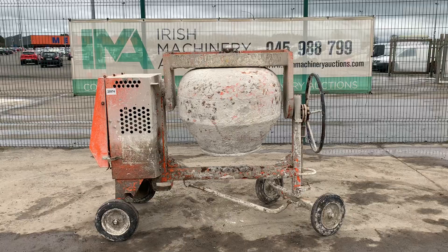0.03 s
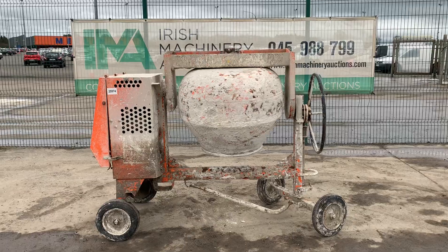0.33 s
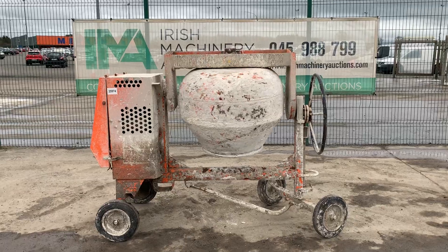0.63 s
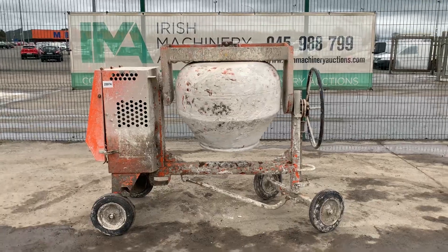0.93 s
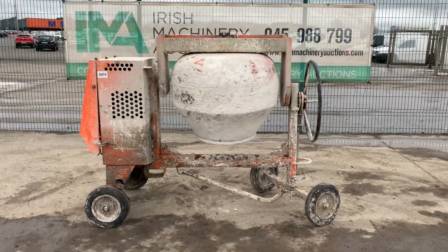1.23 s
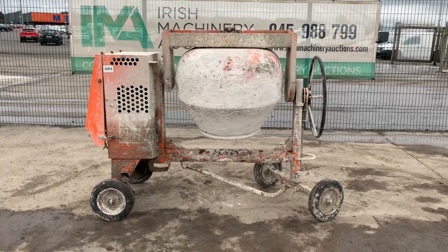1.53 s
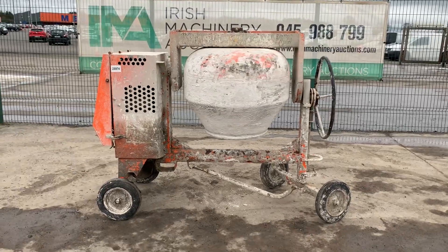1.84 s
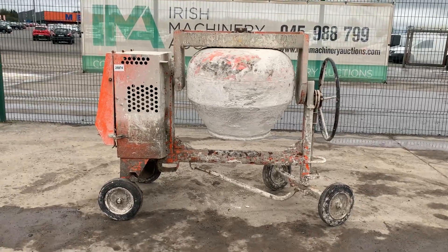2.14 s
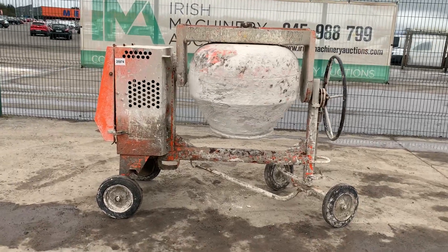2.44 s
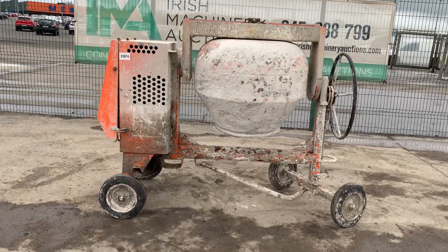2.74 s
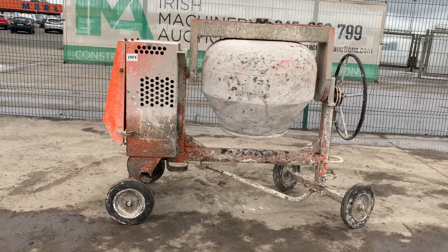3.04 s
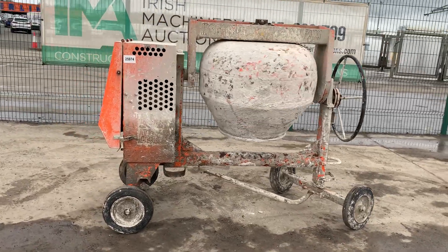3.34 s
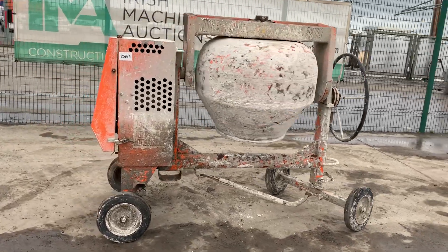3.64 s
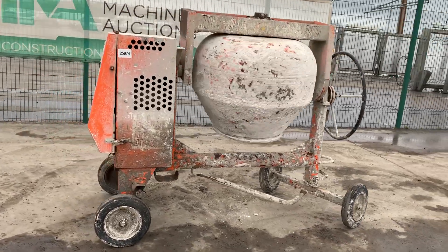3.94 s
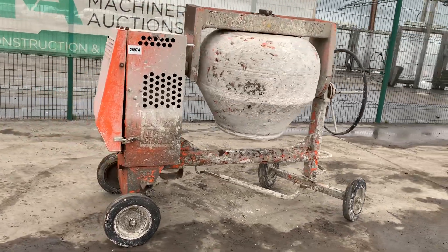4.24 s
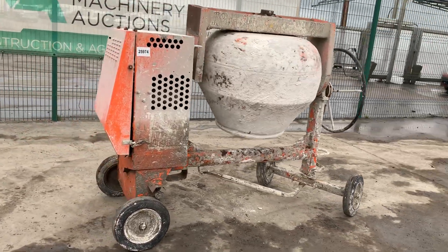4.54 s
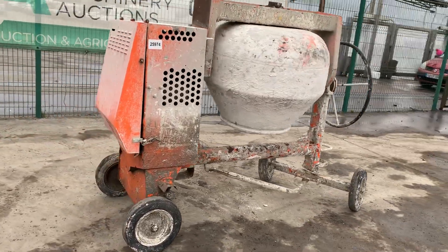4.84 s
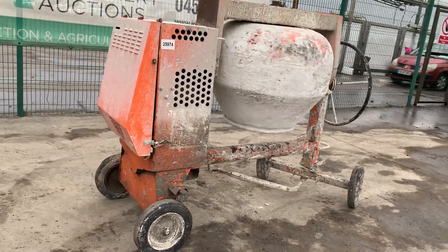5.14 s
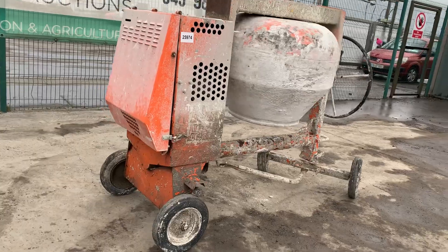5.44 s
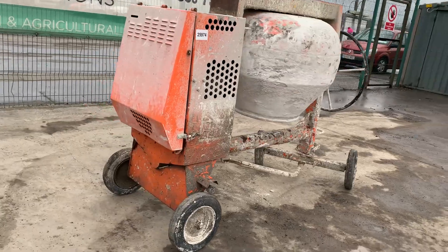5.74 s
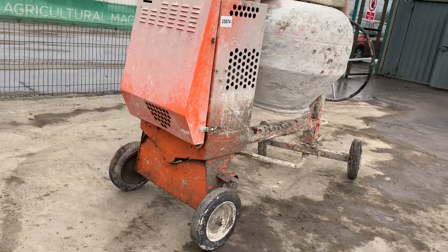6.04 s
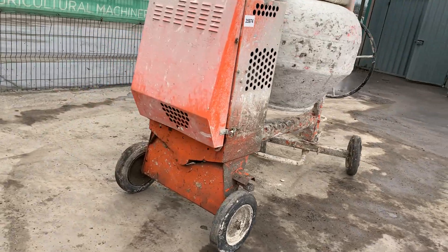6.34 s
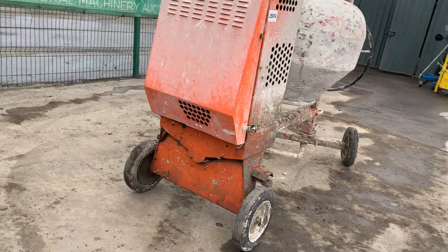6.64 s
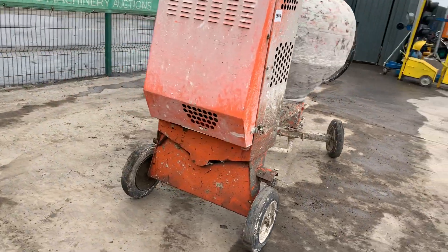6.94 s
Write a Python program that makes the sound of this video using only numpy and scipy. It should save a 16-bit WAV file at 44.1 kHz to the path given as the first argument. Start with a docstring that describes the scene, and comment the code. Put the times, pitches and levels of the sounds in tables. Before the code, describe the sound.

A diesel cement mixer chugs steadily outdoors while its empty drum turns with irregular clanks and rattles.

```python
"""An open yard, where a cement mixer runs while someone with a phone walks round to its engine cowl.
A breeze flutters and bumps on the microphone ports. The ring gear grinds, loose metal ticks,
and the empty drum clanks in its slack and booms. Up front, a single-cylinder diesel fires every
second turn: puffs ring the silencer, knocks ring the block, the panels and the cowl."""
import sys
import numpy as np
from scipy import signal
from scipy.fft import rfft, irfft
from scipy.io import wavfile
from scipy.ndimage import uniform_filter1d

SR = 44100
rng = np.random.default_rng(int(sys.argv[2]) if len(sys.argv) > 2 else 0)


def store_wav(level_fs):
    """Save 16-bit WAV to argv[1]."""
    pcm = np.round(np.clip(np.atleast_2d(level_fs), -1, 1) * 32767)
    wavfile.write(sys.argv[1], SR, pcm.T.astype(np.int16))


N = 312228
TIME = np.arange(N) / SR
DIRECT_ONLY = np.array([[1], [0]])  # gains for the direct and the scattered sound


def undb(db):
    """Decibels to gain."""
    return 10 ** (np.asarray(db) / 20)


def unit(x):
    """Scale to an rms of 1."""
    return x / np.sqrt(np.mean(x ** 2))


def bell(offset_s, spread_s):
    """A smooth hump of height 1 where the offset is zero."""
    return np.exp(-.5 * (offset_s / spread_s) ** 2)


def curve(table):
    """Join rows of time and value with straight lines."""
    return np.interp(TIME, *np.transpose(table))


def on_log_axis(hz, points):
    """Read a spectrum at the given frequencies."""
    point_hz, value = np.transpose(points)
    return np.interp(np.log(hz + 1), np.log(point_hz), value)


def colour(x, points, size=4096):
    """Minimum-phase EQ with the given shape and a power gain of 1."""
    gain = undb(on_log_axis(np.fft.rfftfreq(size, 1 / SR), points))
    cepstrum = irfft(np.log(gain))
    cepstrum[1:size // 2] *= 2
    cepstrum[size // 2 + 1:] = 0
    response = irfft(np.exp(rfft(cepstrum)))
    response /= np.linalg.norm(response)
    return signal.fftconvolve(np.atleast_2d(x), response[None], axes=1)[:, :N]


def ring(x, hz, width_hz):
    """One decaying mode, rung by x."""
    pole = np.exp((2j * np.pi * hz - np.pi * width_hz) / SR)
    return signal.lfilter([1, -pole.real], [1, -2 * pole.real, abs(pole) ** 2], x)


def pulses(times, sizes):
    """Clicks at the given times, each shared between two samples."""
    at = np.clip(np.asarray(times) * SR, 0, N)
    i = at.astype(int)
    before = np.bincount(i, sizes * (1 - at + i), N + 2)
    after = np.bincount(i + 1, sizes * (at - i), N + 2)
    return (before + after)[:N]


def fade(times, db, t60_s, attack_s=0.0017):
    """Envelope of blows whose energies add up and die away."""
    decay = np.exp(-2 * np.log(1000) / (t60_s * SR))
    energy = signal.lfilter([1], [1, -decay], pulses(times, undb(db) ** 2))
    rise = np.exp(-1 / (attack_s * SR))
    return signal.lfilter([1 - rise], [1, -rise], np.sqrt(energy))


def noise():
    """Two unrelated noises: the direct sound and the scattered sound."""
    return rng.standard_normal((2, N))


def wander(rate_hz):
    """A random glide between -1 and 1, with rate_hz new targets a second."""
    hold = int(SR / rate_hz)
    steps = np.repeat(rng.standard_normal(1024)[:N // hold + 1], hold)
    return np.tanh(2.2 * uniform_filter1d(steps, hold)[:N])


def facing(faced_s, spread_s=0.66, aside_db=-10):
    """Gain of a part that beams its sound one way as the listener walks by."""
    return undb(aside_db * (1 - bell(TIME - faced_s, spread_s)))


def strokes(cycle, share, jitter_s, scatter_db):
    """Times and levels in dB of something that happens once in each engine cycle."""
    times = np.interp(np.arange(int(cycle[-1]) + 1) + share, cycle, TIME)
    late, loud = rng.standard_normal((2, len(times)))
    return times + jitter_s * late, scatter_db * loud


def teeth(rate_hz, jitter_s, scatter_db, t60_s):
    """Envelope of gear teeth passing, uneven in time and level."""
    times = np.arange(int(TIME[-1] * rate_hz)) / rate_hz
    late, loud = rng.standard_normal((len(times), 2)).T
    return fade(times + jitter_s * late, scatter_db * np.tanh(loud), t60_s)


# The low flutter of wind. Each row: frequency in Hz, relative level in dB.
WIND_EQ = [(15, -36), (30, -19), (48, -9), (65, 0), (100, -4.5), (160, -5), (300, -22), (800, -55)]
# Swells of the breeze. Each row: crest in seconds, spread in seconds, lift over the lull in dB.
WIND_GUSTS = [(.85, 0.62, 6), (6.0, 0.48, 7.5), (6.75, 0.27, 3.5)]
# Dull wind bumps. Each row: start in seconds, relative level in dB, trim of the upper thud in dB.
WIND_BUMPS = [(0.575, -13, -15), (0.984, -6, -4.5), (1.172, -15, -14), (3.495, -19, -28), (5.201, -10, -10),
              (5.77, -6, -14), (5.945, -8, -5.5), (6.112, -9.5, -3), (6.519, -10, -2), (7.049, -7.5, -13)]


def breeze(lull_db=-27.5, flutter_db=1.5, scattered_db=6):
    """Eddies flutter on each port and swell in gusts; the strongest arrive as dull bumps."""
    gusts_db = sum(lift * bell(TIME - s, spread) for s, spread, lift in WIND_GUSTS)
    flow = undb(lull_db + flutter_db * wander(rate_hz=11) + gusts_db)
    starts, db, thud_db = np.transpose(WIND_BUMPS)
    buffets = undb(-9.5) * fade(starts, db, t60_s=0.083)
    eddies = colour((flow + buffets) * noise(), WIND_EQ)
    thump = undb(-5) * ring(pulses(starts, undb(db)), hz=86, width_hz=34)
    thud = undb(10) * ring(pulses(starts, undb(db + thud_db)), hz=194, width_hz=90)
    bumps = signal.sosfilt(signal.butter(3, 300, fs=SR, output="sos"), thump + thud)
    return eddies * undb([[0], [scattered_db]]) + bumps * DIRECT_ONLY


def louvres():
    """Cooling air hisses from the cowl, loudest in front of its two sets of vents."""
    air = colour(noise(), [(4000, -44), (6200, -8.5), (6900, 2), (7500, -9), (9500, -29)])
    first_vents = undb(-42) * facing(5.2, spread_s=0.73, aside_db=-12)
    second_vents = undb(-35) * facing(6.59, spread_s=0.2, aside_db=-19)
    return air * (first_vents + second_vents)


def jingle():
    """Loose metal ticks faintly as the gear teeth pass, with the same bright tone as the valve."""
    taps = teeth(rate_hz=15, jitter_s=0.0095, scatter_db=2.4, t60_s=0.055)
    return undb(-28.5) * colour(taps * noise(), VALVE_EQ)


# The thin tone of small metal. Each row: frequency in Hz, relative level in dB.
TICK_EQ = [(1000, -14), (3000, -5), (5200, 2), (7000, 1.5), (9500, 4), (11500, 3.5), (14000, -7),
           (16000, -6)]
# Bright metallic ticks. Each row: start in seconds, relative level in dB.
BRIGHT_TICKS = [(2.5346, -35), (4.6357, -27), (4.754, -36), (4.8662, -24), (4.9417, -27), (5.044, -22.5),
                (5.077, -35), (5.4567, -30), (5.5927, -24), (5.685, -24.5), (5.7458, -24), (5.818, -21.5),
                (5.968, -29), (6.0207, -19.5), (6.099, -23), (6.2245, -27), (6.2947, -14.5), (6.4048, -25),
                (6.5727, -15), (6.7767, -21)]


def ticks():
    """Short, bright metallic ticks: louder valve ticks and loose metal jolted by the clanks."""
    starts, db = np.transpose(BRIGHT_TICKS)
    envelope = fade(starts, db, t60_s=0.091, attack_s=0.00054)
    return undb(-2) * colour(envelope * noise(), TICK_EQ)


def rattle(count=520, level_db=-16.5):
    """Light, dry taps of loose bits on the drum, dying away after each clank."""
    starts, db, _ = np.transpose(DRUM_CLANKS)
    when, size = rng.random((count, 2)).T
    taps = unit(fade(when * TIME[-1], 12 * size, t60_s=0.03))
    settling = fade(starts, db + level_db, t60_s=0.97)
    return colour(settling * taps * noise(), TICK_EQ)


# Cracks from the gear. Each row: start in seconds, relative level in dB, band centre in Hz.
TOOTH_SNAPS = [(0.3137, -19, 3870), (3.94, -25, 5000), (4.503, -21, 5200), (4.7594, -26, 5100),
               (5.17, -20.5, 4940), (5.3194, -23, 4900), (6.2975, -21, 5370)]


def snaps(width_hz=1100):
    """A tooth of the ring gear snaps home: a short, dry, metallic crack."""
    out, grain = 0, noise()
    for start, db, hz in TOOTH_SNAPS:
        band = signal.butter(1, [hz - width_hz / 2, hz + width_hz / 2], "band", fs=SR, output="sos")
        crack = unit(signal.sosfilt(band, grain))
        out = out + fade([start], [db], t60_s=0.16, attack_s=0.00066) * crack
    return undb(-3) * out


# The drum's hollow notes. Each row: pitch in Hz, bandwidth in Hz, gain in dB.
SHELL_MODES = [(267, 18, -19), (344.3, 13.7, 7), (442.7, 9, 0), (645.6, 15, 2.5)]


def shell(x):
    """The empty drum resonates, rung by x."""
    return sum(undb(db) * ring(x, hz, width) for hz, width, db in SHELL_MODES)


# Hollow booms. Each row: start in seconds, relative level in dB.
DRUM_BOOMS = [(1.864, -13), (3.514, -10), (3.695, -13), (5.194, -12.5), (6.304, -8.5), (6.522, -15)]


def booms():
    """Heavy blows ring the hollow shell."""
    starts, db = np.transpose(DRUM_BOOMS)
    return undb(-11) * shell(pulses(starts, undb(db)))


def drum_load(near, turn_s=3.2, tight_at_s=0.3):
    """Gains of rumble and grit: both rise as the gear runs tight each turn; clanks leave a shudder."""
    from_tight_s = (TIME - tight_at_s + turn_s / 2) % turn_s - turn_s / 2
    tight = bell(from_tight_s, spread_s=0.13)
    starts, db, _ = np.transpose(DRUM_CLANKS)
    shudder = fade(starts, db - 8, t60_s=1)
    return np.hypot(undb(-27 + 3 * tight), shudder), undb(-34 + 1.5 * near + 4 * tight)


# Dark drum rumble and sharp cement grit. Each row: frequency in Hz, relative level in dB.
DRUM_EQ = [(60, -10), (130, -6), (220, 0), (320, 0), (410, -6), (600, -2), (800, -5.5), (1500, -11),
           (2500, -20), (5000, -34.5)]
GRIT_EQ = [(1000, -20), (2800, 7.5), (3700, 14), (4500, 6), (5200, 6.5), (6200, -1.5), (9200, 3),
           (10300, -1), (11200, -1.5), (14000, -12), (16000, -15)]


def gear(rumble_gain, grit_gain, crumb_count=420):
    """Teeth of the ring gear mesh unevenly; the drum rumbles and dried cement grits between them."""
    mesh = unit(teeth(rate_hz=14.3, jitter_s=0.0087, scatter_db=4, t60_s=0.27))
    when, size = rng.random((crumb_count, 2)).T
    crumbs = unit(fade(when * TIME[-1], 20 * size ** 3, t60_s=0.11))
    scrape = np.sqrt(0.9 + .5 * mesh ** 2 + 0.24 * crumbs ** 2) * noise()
    grit = unit(colour(scrape, GRIT_EQ))
    rolling = colour(np.sqrt(2 + 0.13 * mesh ** 2) * noise(), DRUM_EQ)
    rumble = unit(rolling) + undb(-9) * unit(shell(rolling))
    return grit * grit_gain + rumble * rumble_gain


# The crash of struck steel. Each row: frequency in Hz, relative level in dB.
STEEL_EQ = [(200, -4), (330, 23), (620, 12.5), (1100, 5), (2000, 9), (2900, 6.5), (3800, 7.5), (5150, 12),
            (6200, 5), (9300, 4.5), (11200, 7), (14000, -4), (16000, -24)]
# The drum's high ring. Each row: pitch in Hz, bandwidth in Hz, relative level in dB.
STEEL_RING = [(4950, 80, -9), (5210, 74, -7), (11250, 160, -5)]
# Clanks in the gear's slack. Each row: start in seconds, relative level in dB, trim of the body in dB.
DRUM_CLANKS = [(0.3123, -19, 6.5), (0.3374, -35, -8), (0.4972, -26.5, 12.5), (0.802, -18.5, 2.5),
               (1.428, -21, 4), (1.4985, -18, -3), (1.53, -24.5, 10), (1.86, -18, -9), (1.89, -17.5, 7.5),
               (2.064, -17.5, 4.5), (2.172, -19.5, 1), (2.199, -23.5, 9), (2.7156, -24.5, 8.5),
               (3.1644, -22.5, 9.5), (3.355, -21, -2), (3.45, -13.5, -2), (3.4744, -16, -5),
               (3.6406, -20.5, 2), (3.682, -20.5, 6), (3.936, -21, -10), (4.133, -22.5, 4), (4.5, -19, 3),
               (5.165, -20.5, -6), (6.294, -17.5, 1), (6.4625, -22, -12), (6.4944, -18, -16),
               (6.575, -17, -4), (6.776, -19.5, 0), (7.055, -20, 3)]


def clanks(bounce_s=0.02, bounce_db=-7):
    """The drum drops through its slack and bounces: a ringing crash over a slower, hollow body."""
    starts, db, body_db = np.transpose(DRUM_CLANKS)
    bounces = starts + bounce_s * (.5 + rng.random(len(starts)))
    crash = fade(np.r_[starts, bounces], np.r_[db, db + bounce_db], t60_s=0.22, attack_s=0.00051)
    body = fade(starts + 0.0084, db + body_db, t60_s=0.62)
    contact = undb(-3.5) * crash * noise()
    ringing = sum(undb(gain_db - 8) * np.sqrt(2 * np.pi * width / SR) * ring(contact, hz, width)
                  for hz, width, gain_db in STEEL_RING)
    return colour(contact, STEEL_EQ) + ringing + undb(-7) * colour(body * noise(), DRUM_EQ)


# The valve's crisp tick. Each row: frequency in Hz, relative level in dB.
VALVE_EQ = [(2000, 10), (4000, -16), (6500, -1), (9500, 5), (11300, -1.5), (14000, 0), (16000, -26)]


def valve(cycle, near):
    """A valve seats: a bright tick with a short hiss, once a cycle."""
    times, db = strokes(cycle, share=.245, jitter_s=0.00014, scatter_db=3)
    return undb(-29.5 + 4.5 * near) * colour(fade(times, db, t60_s=0.1) * noise(), VALVE_EQ)


# The throb of silencer and air box, each with its housing. Each row: pitch in Hz, bandwidth in Hz,
# relative level in dB, moment faced in seconds, spread in seconds.
SILENCER_MODES = [(154.8, 6, -19.7, 1.9, 4.4), (138.3, 6.7, -25.1, 3, 3), (103.7, 6, -36, 6.4, 1.1),
                  (194.8, 6, -34, 1.4, 1.6), (237.9, 6, -31.5, 5.3, 1), (78, 6, -31, 5.5, 1.1)]
AIR_BOX_MODES = [(137.4, 6, -26.1, 5.2, 1.2), (106.4, 10.2, -28, 5.1, 6.3), (58.9, 6, -38, 5.5, 3),
                 (213.8, 6, -33, 2, 5), (273, 6, -35.5, 5, 1.2), (176, 5, -38, 5.5, .7)]


def chug(cycle, exhaust_share=.465, intake_share=.776):
    """The exhaust puffs, then the intake sucks; each rings its own resonances: a double throb."""
    soften = signal.butter(2, 260, fs=SR, output="sos")
    out = 0
    for share, sign, modes in (exhaust_share, 1, SILENCER_MODES), (intake_share, -1, AIR_BOX_MODES):
        times, scatter = strokes(cycle, share, jitter_s=.00012, scatter_db=1.4)
        gas = signal.sosfilt(soften, sign * pulses(times, undb(scatter)))
        for hz, width, db, faced_s, spread_s in modes:
            out = out + undb(db) * facing(faced_s, spread_s, aside_db=-17) * unit(ring(gas, hz, width))
    return undb(0.34) * out


# The fader ride on the cowl's singing note. Each row: time in seconds, level in dB.
COWL_RIDE = [(0, -30.5), (.7, -27.5), (1.2, -34.5), (1.6, -31.5), (2.35, -36), (2.8, -28.5), (3.75, -29),
             (4.75, -34.5), (5.5, -27.5), (7.08, -39.5)]
# Damped clangs of cowl and crankcase. Each row: pitch in Hz, bandwidth in Hz, level in dB,
# strike point as a share of the cycle, moment faced in seconds, spread in seconds.
CLANG_MODES = [(1637, 31, -27.5, 0.01, 3.73, 1.03), (1545, 38, -31.5, 0.026, 4.07, 0.9),
               (1720, 52, -42, 0.019, 3.9, .75), (1608, 28, -30.5, .09, 3.2, 0.47),
               (1597, 100, -34, .855, 4.9, 1.3), (1085, 31, -36.5, .85, 5.16, 0.98),
               (1248, 40, -36, .03, 4.6, 0.85), (923, 50, -38.5, .345, 1.7, 2.2),
               (973, 37, -36.5, .46, 4.74, 0.99), (1610, 58, -38.5, .12, 0.72, 0.75),
               (1307, 23, -37, .58, 1.4, 1.6)]


def cowl(cycle):
    """The firing shock keeps one bright mode singing; damped modes clang, each once a cycle."""
    times, scatter = strokes(cycle, share=.04, jitter_s=.00006, scatter_db=1.5)
    singing = unit(ring(pulses(times, undb(scatter)), hz=1640, width_hz=7.9))
    out = undb(curve(COWL_RIDE)) * singing
    for hz, width, db, share, faced_s, spread_s in CLANG_MODES:
        times, scatter = strokes(cycle, share, jitter_s=.00005, scatter_db=1.6)
        clang = unit(ring(pulses(times, undb(scatter)), hz, width))
        out = out + undb(db) * facing(faced_s, spread_s, aside_db=-20) * clang
    return out


# Ringing sheet metal. Each row: pitch in Hz, bandwidth in Hz, relative level in dB,
# moment faced in seconds.
PANEL_MODES = [(352.1, 3.35, -3, 3.3), (436, 13, 2, 6.7), (507.4, 7, 1.5, 2.93), (546.6, 5.4, 1.5, 5.4),
               (690, 9, -3, 5.5), (883, 11, -0.5, 3.1), (910, 5.9, -4.5, 0.83), (976, 2.8, -0.5, 5.4),
               (1090, 6.7, -2, 4.8), (1249, 15, -0.5, 4), (1420, 8.9, -0.5, 6.6), (1302, 13, -3, 1.4),
               (1463, 8, -3, 5.4), (1624, 19, 4, 3.6), (1837, 14, -2.5, 6.5), (2058, 43, -3, 1.1),
               (2395, 20, -5, 0.1), (2590, 220, -24, 8.9), (3500, 200, -3, 4.5)]


def panels(blows, patchy_db=4):
    """Blows shake the panels; each ring comes and goes as the listener moves, and swells when faced."""
    return sum(undb(db + patchy_db * wander(rate_hz=1.635)) * facing(s) * unit(ring(blows, hz, width))
               for hz, width, db, s in PANEL_MODES)


def block_ring(times, sizes, t60_s=.085, view_count=6, length=4096):
    """Each blow rings the block; the ring changes slowly as the listener moves round the machine."""
    tail = np.exp(-np.log(1000) * TIME[:length] / t60_s)
    views = rng.standard_normal((view_count, 2, length)) * tail
    place = times / TIME[-1] * (view_count - 1)
    crossfade = np.sqrt(np.clip(1 - abs(place[:, None] - np.arange(view_count)), 0, 1))
    rings = np.tensordot(crossfade * sizes[:, None], views, 1)
    track = np.zeros((2, N + 2 * length))
    for start, burst in zip(abs(times * SR).astype(int), rings):
        track[:, start:start + length] += burst
    return track[:, :N]


# The solid block and its brighter loose clatter. Each row: frequency in Hz, relative level in dB.
BLOCK_EQ = [(150, -16), (300, 0), (410, -3), (560, 8), (780, -5), (1200, -3.5), (1700, -5), (2100, -2.5),
            (2800, -29), (4500, -24), (9000, -34.5)]
CLATTER_EQ = [(200, -14.5), (500, 3.5), (900, 3), (1400, -1), (1900, 1), (2400, 2.5), (2950, -5),
              (3700, -6.5), (5000, -8.5), (8000, -19.5), (15000, -32)]
# The fader ride on the clatter. Each row: time in seconds, level in dB.
CLATTER_RIDE = [(0, -27), (2.4, -34), (4.2, -32.5), (5.5, -30.5), (6.6, -25), (7.08, -27.5)]
# The beat of combustion, piston slap and valves. Each row: share of the cycle, relative level in dB.
ENGINE_BLOWS = [(.865, 1), (.985, -1), (0.114, -4), (.28, -5), (.45, -6), (0.609, -4.5)]


def knocking(cycle, near):
    """The diesel's blows ring the block, shake the panels and rattle loose parts."""
    block, blows, clatter_power = 0, 0, 0
    for share, db in ENGINE_BLOWS:
        times, scatter = strokes(cycle, share, jitter_s=.00004, scatter_db=2.1)
        sizes = undb(db + scatter)
        block = block + block_ring(times, sizes)
        blows = blows + pulses(times, sizes)
        clatter_power = clatter_power + fade(times, db + scatter, t60_s=.11) ** 2
    body = undb(-1.5) * unit(colour(block, BLOCK_EQ)) + undb(-8.5) * panels(blows) * DIRECT_ONLY
    clatter = unit(colour(np.sqrt(clatter_power) * noise(), CLATTER_EQ))
    return undb(-29.5 + 5.5 * near) * body + undb(curve(CLATTER_RIDE)) * clatter


# The stereo image. Each row: frequency in Hz, phase lead of the left in radians, likeness from 0 to 1.
PORT_IMAGE = [(150, 0.17, 0.92), (1500, 0.67, 0.81), (2400, 1.66, 0.74), (3150, 3.1, 0.73),
              (4600, 2.3, 0.17), (6000, 6.09, 0.02), (7000, 5.18, 0.66), (8550, 3.14, 1.0),
              (10000, 1.2, 0.84), (10800, 0.01, 0.99), (11400, -0.24, 0.93), (12300, -1.75, 0.81),
              (13450, -3.14, 1.0), (14600, -4.78, 0.59), (15500, -6.28, 0.98)]
# The stereo balance. Each row: frequency in Hz, left minus right in dB.
PORT_BALANCE = [(130, 0.2), (350, 0.5), (1300, 0), (2400, -2), (4600, -2.5), (7000, -1.5), (12000, 0)]


def microphone_ports(direct, scattered):
    """Two closely spaced ports share the direct sound; the scattered sound sets them apart."""
    hz = np.fft.rfftfreq(N, 1 / SR)
    port_hz, *columns = np.transpose(PORT_IMAGE)
    lead, likeness = (np.interp(hz, port_hz, column) for column in columns)
    mid = rfft(direct) * np.sqrt((1 + likeness) / 2)
    side = rfft(scattered) * np.sqrt((1 - likeness) / 2)
    lean = undb(on_log_axis(hz, PORT_BALANCE) / 2) * np.exp(.5j * lead)
    return irfft(np.array([(mid + side) * lean, (mid - side) / lean]), N)


# The crankshaft's governed pace. Each row: time in seconds, speed in turns a minute.
ENGINE_RPM = [(0, 2336), (1.2, 2335), (1.55, 2322.5), (2.1, 2334.5), (2.8, 2334.5), (3.8, 2352.5),
              (4.4, 2335.5), (5.8, 2340), (6.6, 2352), (7.08, 2339)]
# The walk from the mixer's side to its cowl. Each row: time in seconds, closeness from 0 to 1.
WALK_UP = [(0, 0.13), (2.8, 0.84), (4.6, 0.7), (5.9, 0.99), (6.6, 1), (7.08, 0.8)]


def scene():
    """Engine, drum and breeze, heard in stereo along the walk."""
    cycle = np.cumsum(curve(ENGINE_RPM)) / (2 * 60 * SR)  # engine cycles so far, two turns each
    near = curve(WALK_UP)
    engine = knocking(cycle, near) + valve(cycle, near) + louvres()
    drum = gear(*drum_load(near)) + clanks() + snaps() + rattle()
    direct, scattered = engine + drum + ticks() + jingle() + breeze()
    direct = direct + chug(cycle) + cowl(cycle) + booms()
    return microphone_ports(direct, scattered)


def record(dry, opens_s=.084, ceiling=.88, top_hz=15900):
    """The phone opens after a moment, drops the deepest rumble, rounds the peaks and cuts the top."""
    opened = dry * np.clip((TIME - opens_s) / .003, 0, 1)
    trimmed = signal.sosfilt(signal.butter(3, 30, "high", fs=SR, output="sos"), opened)
    rounded = trimmed / (1 + (trimmed / ceiling) ** 6) ** (1 / 6)
    return signal.sosfilt(signal.ellip(10, .2, 80, top_hz, fs=SR, output="sos"), rounded)


dry = scene()
out = record(dry)
store_wav(out)
```